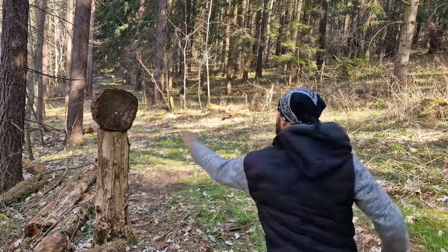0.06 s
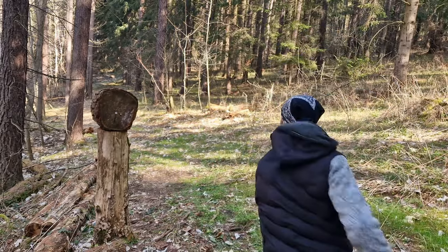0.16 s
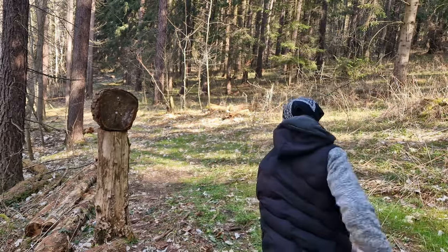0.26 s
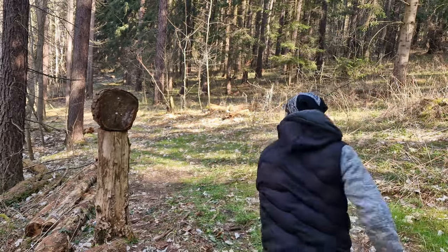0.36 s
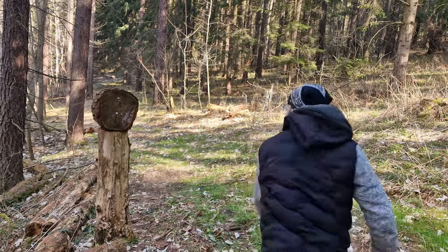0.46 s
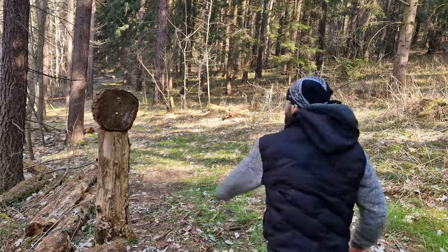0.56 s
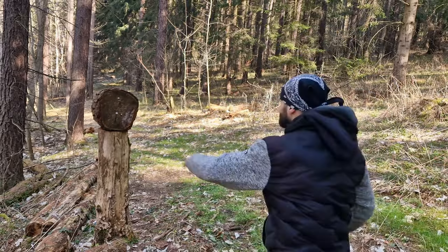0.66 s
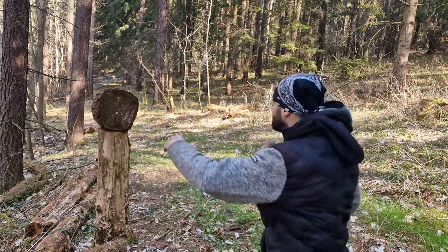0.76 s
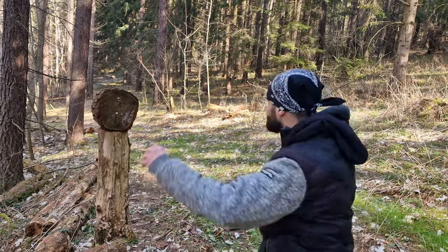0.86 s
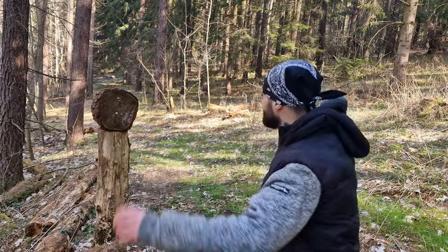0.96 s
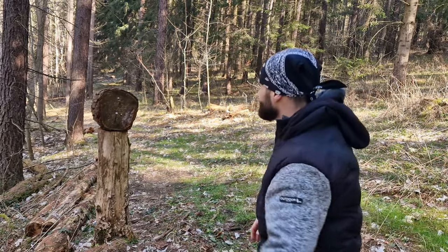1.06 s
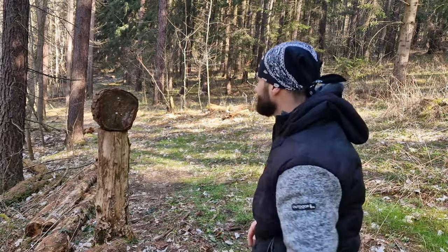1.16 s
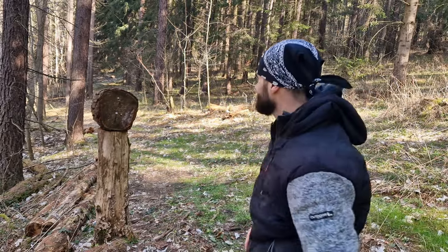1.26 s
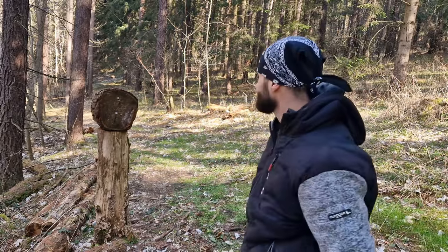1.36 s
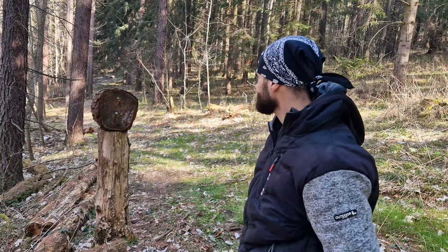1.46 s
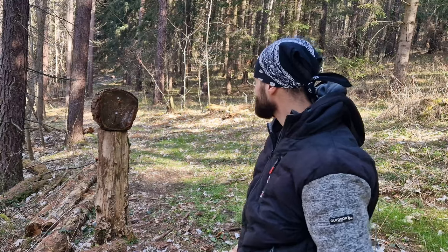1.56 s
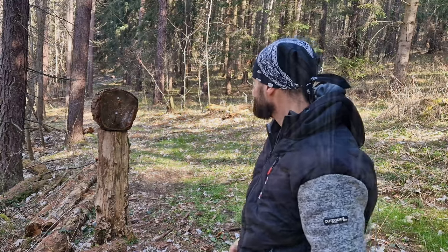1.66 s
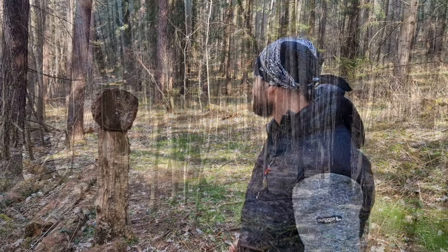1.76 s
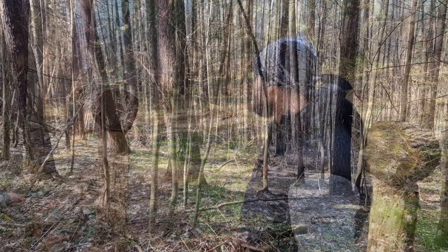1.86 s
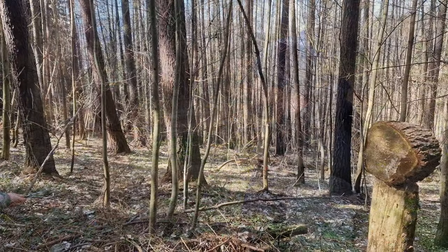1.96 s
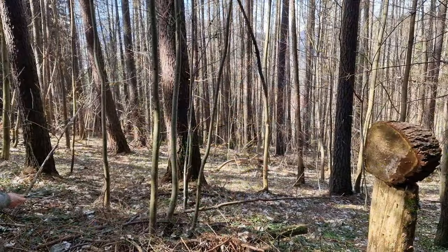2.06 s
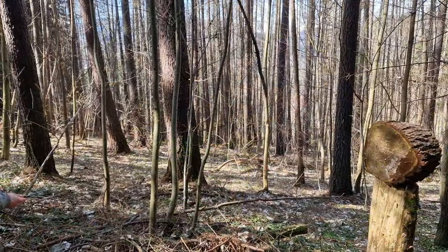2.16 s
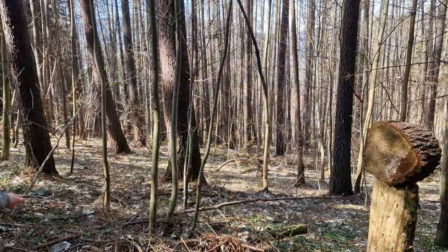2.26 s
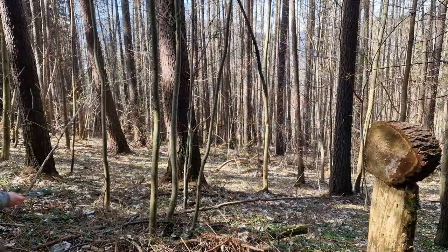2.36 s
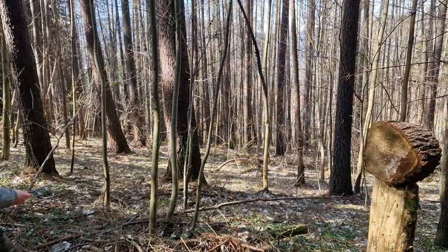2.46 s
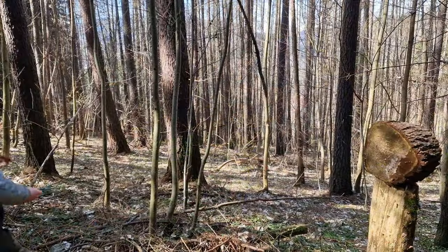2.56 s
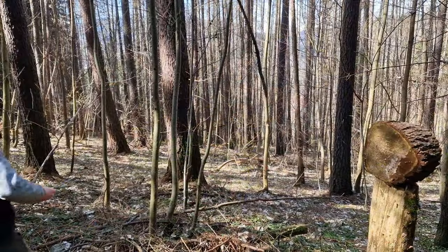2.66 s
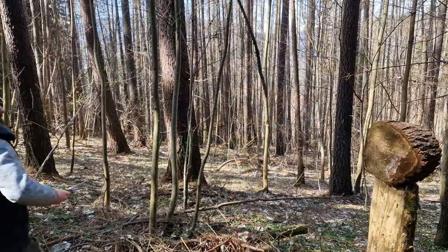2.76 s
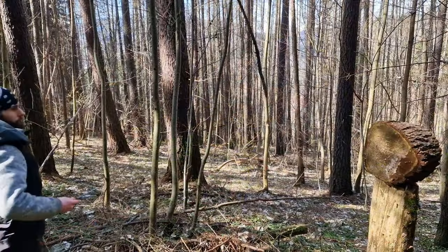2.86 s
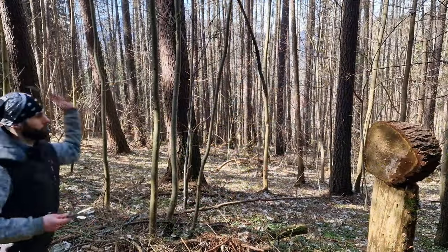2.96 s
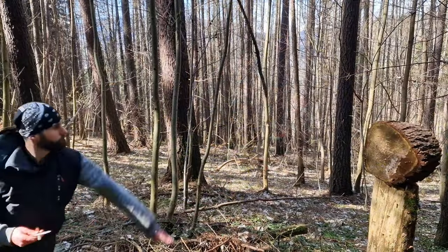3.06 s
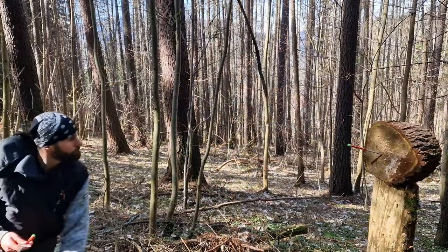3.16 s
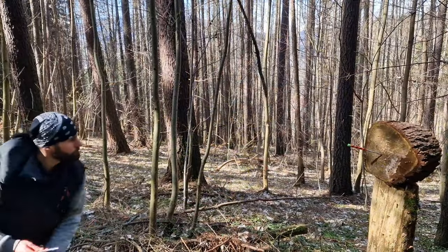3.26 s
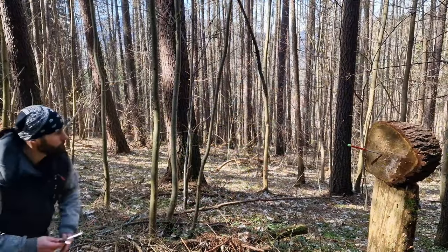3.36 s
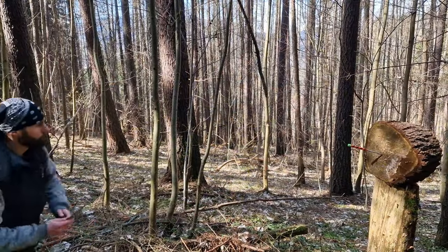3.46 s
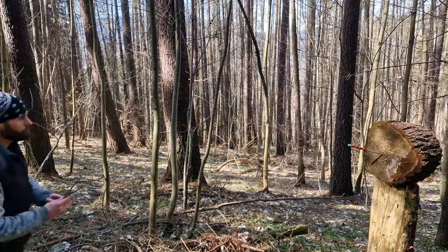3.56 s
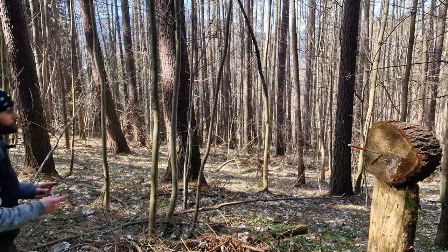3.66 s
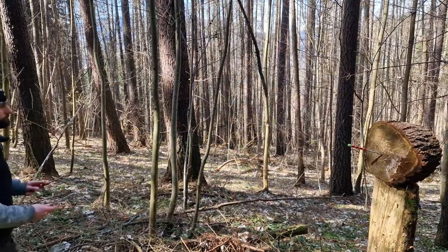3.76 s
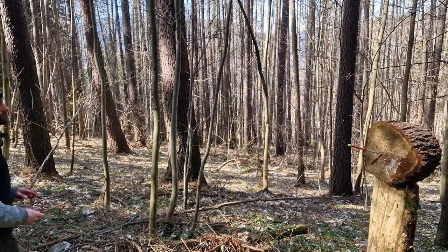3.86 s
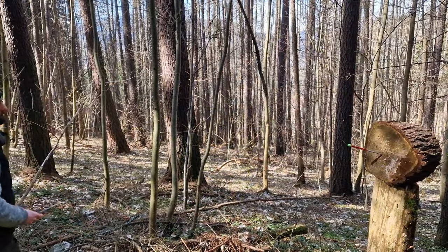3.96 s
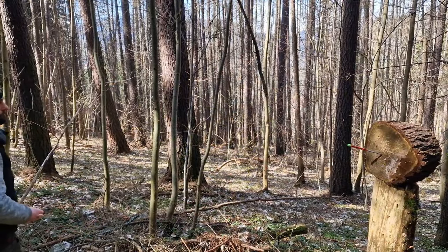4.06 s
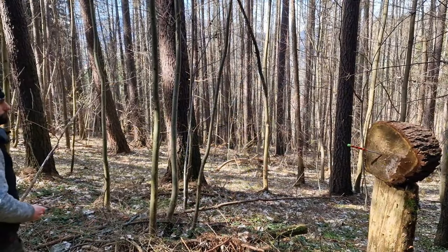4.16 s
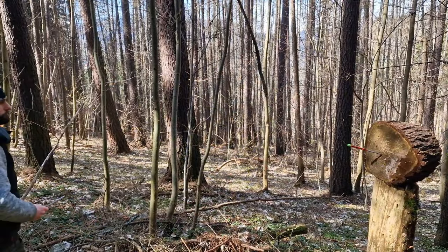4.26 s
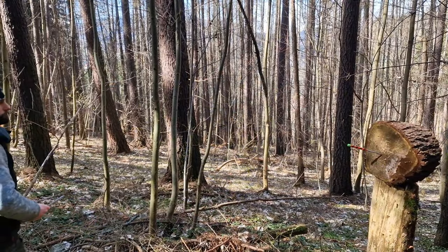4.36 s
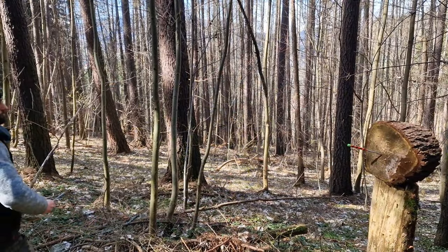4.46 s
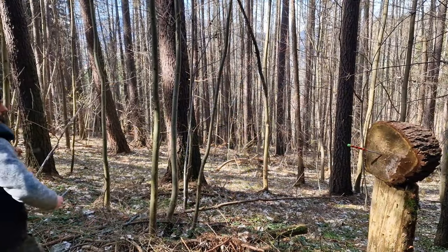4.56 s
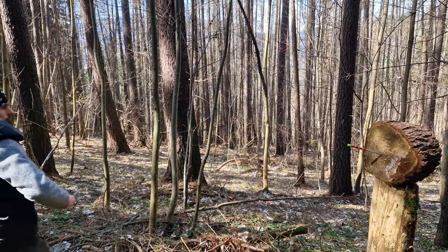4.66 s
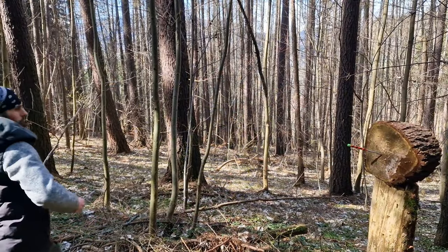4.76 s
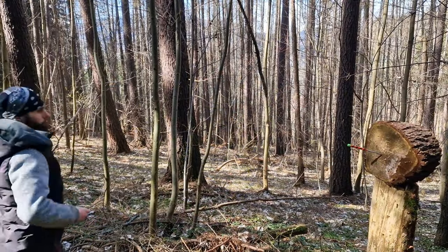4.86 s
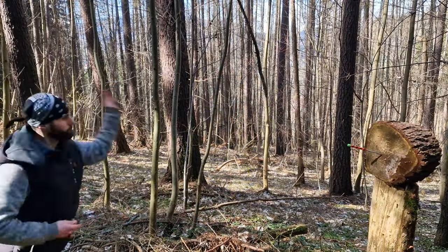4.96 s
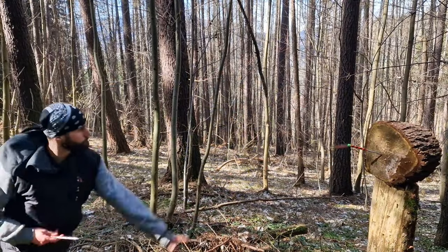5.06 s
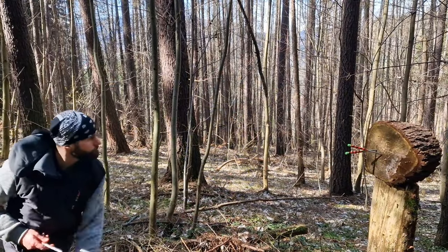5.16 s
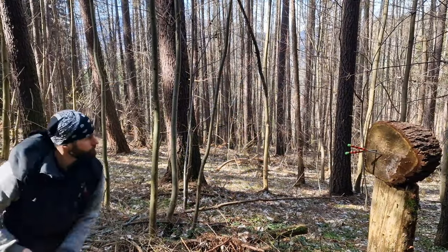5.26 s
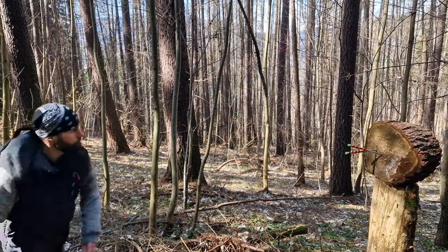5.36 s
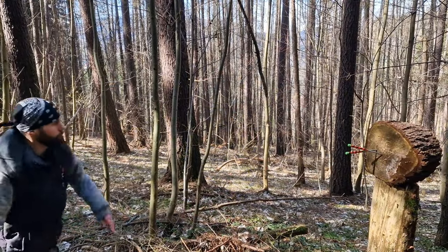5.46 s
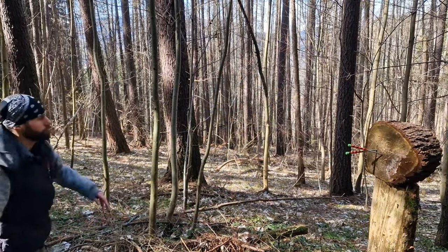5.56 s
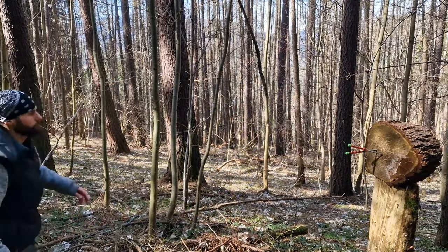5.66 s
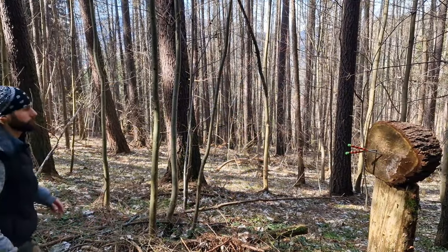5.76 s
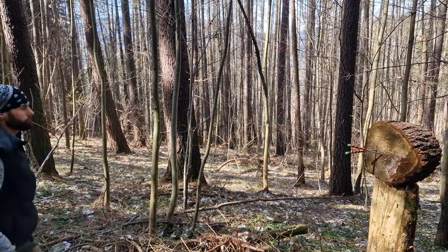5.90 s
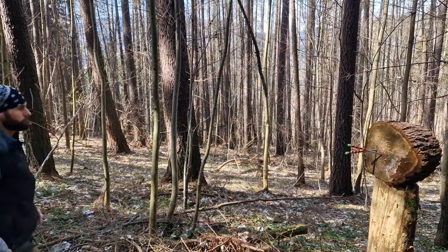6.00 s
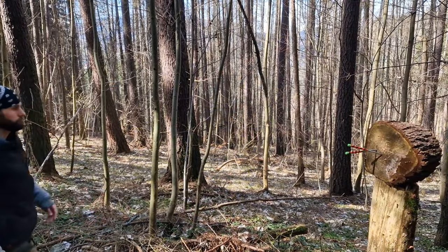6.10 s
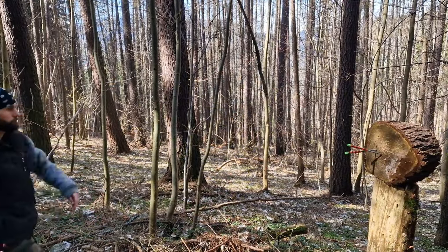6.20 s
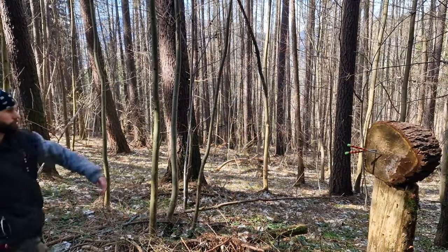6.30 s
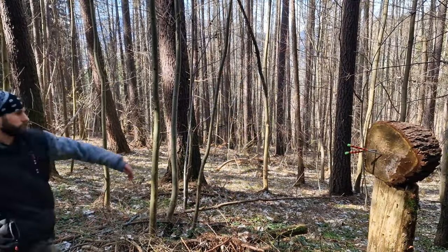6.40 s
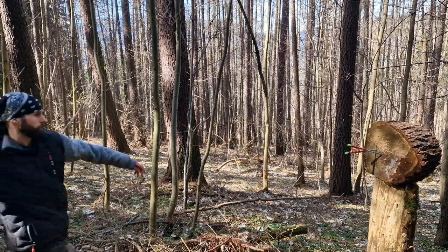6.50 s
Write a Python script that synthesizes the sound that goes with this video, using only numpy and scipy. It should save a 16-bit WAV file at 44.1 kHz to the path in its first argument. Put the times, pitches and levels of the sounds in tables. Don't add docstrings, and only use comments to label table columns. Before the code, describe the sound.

Three thrown steel nails thunk into a log, one early, two later, amid jacket swishes, low wind rumble and faint birds in a forest.

```python
import sys
import numpy as np
from scipy import signal
from scipy.fft import rfft, irfft, next_fast_len
from scipy.io import wavfile
from scipy.ndimage import uniform_filter1d, map_coordinates

SR = 44100
rng = np.random.default_rng(int(sys.argv[2]) if len(sys.argv) > 2 else 0)


def volts_from_decibels(level):
    exponent = np.asarray(level, float) / 20
    return 10 ** exponent


def to_wav(s):
    ch = np.atleast_2d(s).T
    pcm = np.round(np.clip(ch, -1, 1) * 32767)
    wavfile.write(sys.argv[1], SR, pcm.astype(np.int16))


N = 288149


def unit(x):
    return x / np.sqrt(np.mean(x ** 2) + 1e-20)


def along(points, hz):
    f, v = np.transpose(points)
    return np.interp(np.log(hz + 1), np.log(f + 1), v)


def curves(rows):
    s, *cols = np.transpose(rows)
    return [np.interp(np.arange(N) / SR, s, c) for c in cols]


def by_spot(pair):
    change_s, fade_s = 2.1, .02
    return np.interp(np.arange(N) / SR, [change_s - fade_s / 2, change_s + fade_s / 2], pair)


def wobble(rate):
    knots = rng.standard_normal(int(N * rate / SR) + 4)
    return map_coordinates(knots, [np.arange(N) * rate / SR])


def filtered(x, response):
    m = next_fast_len(x.shape[-1] + 8192)
    return irfft(rfft(x, m) * response(np.fft.rfftfreq(m, 1 / SR)), m)[..., :x.shape[-1]]


def band(count, hz, width):
    noise = rng.standard_normal(count)
    return unit(filtered(noise, lambda f: 1 / (1 + (np.log((f + 1) / hz) / width) ** 4)))


def two_bands(count, hz, width):
    return np.array([band(count, hz, width) for _ in range(2)])


def rush(spectrum, alike, patchy_db, grain_db):
    z = signal.stft(rng.standard_normal((2, N)), nperseg=512)[2]
    field = uniform_filter1d(rng.standard_normal(z.shape[1:]), size=8, axis=0)
    field = uniform_filter1d(field, size=8, axis=1)
    pair = signal.istft(z * volts_from_decibels(patchy_db * unit(field)), nperseg=512)[1][:, :N]
    pair = pair * volts_from_decibels(grain_db * wobble(400))

    def mid_and_side(hz):
        turn = np.arccos(np.clip(along(alike, hz), -1, 1)) / 2
        return volts_from_decibels(along(spectrum, hz)) * [np.cos(turn), np.sin(turn)]

    mid, side = filtered(pair, mid_and_side)
    return unit(np.array([mid + side, mid - side]))


def add(out, s, sound):
    place = out[:, round(s * SR):][:, :sound.shape[-1]]
    place += sound[..., :place.shape[1]]


def whistle(line_hz):
    return np.sin(2 * np.pi * np.cumsum(line_hz) / SR)


# (t/s, level/dB)
WIND_STRENGTH = [(0.0, -59.5), (0.42, -61), (1.47, -64), (1.91, -55.5), (1.98, -62), (2.85, -54),
                 (3.09, -51.5), (3.75, -58.5), (3.97, -58), (4.84, -61.5), (5.24, -59), (5.46, -61),
                 (5.67, -61), (5.91, -62.5), (6.04, -63), (6.53, -57.5)]
# (f/Hz, level/dB per Hz)
RUMBLE_COLOUR = [(12, -21.5), (25, -13.5), (36, -5), (50, -0.5), (62, -6.5), (75, -22), (110, -54.5),
                 (200, -120)]
# (f/Hz, level/dB per Hz)
UPPER_COLOUR = [(30, -56), (60, -14.5), (76, 0), (92, 0.5), (108, -7), (128, -17), (200, -34.5),
                (400, -120)]
# (f/Hz, level/dB per Hz)
TREETOP_COLOUR = [(76, -30), (130, -13.5), (228, -13.5), (322, -6.5), (356, -9.5), (394, -3.5),
                  (481, -12.5), (532, -11.5), (1100, -24), (1240, -23), (2320, -36), (3600, -35.5),
                  (4600, -42), (6500, -52.5), (16000, -61.5)]
# (f/Hz, likeness from -1 to 1)
AIR_LIKENESS = [(60, .98), (130, .94), (290, .72), (640, .45), (1400, -.1), (3100, 0), (15000, 0)]


def wind():
    deep_db, = curves(WIND_STRENGTH)
    gust_db = deep_db - deep_db.mean()
    roll = rush(RUMBLE_COLOUR, AIR_LIKENESS, patchy_db=0, grain_db=0.5)
    slow = np.abs(uniform_filter1d(roll[0] ** 2, size=SR // 6)) + .05
    deep = volts_from_decibels(deep_db + 6.0) * roll / np.sqrt(slow)
    upper_db = by_spot((-57.5, -62)) + 0.26 * gust_db + 1.5 * wobble(14)
    upper = volts_from_decibels(upper_db) * rush(UPPER_COLOUR, AIR_LIKENESS, patchy_db=1.5, grain_db=3.0)
    tops_db = by_spot((-64.5, -67)) + 0.31 * gust_db + 0.69 * wobble(7.6)
    tops = volts_from_decibels(tops_db) * rush(TREETOP_COLOUR, AIR_LIKENESS, patchy_db=1.1, grain_db=0.5)
    return deep + upper + tops


# (f/Hz, level/dB per Hz)
HISS_COLOUR = [(2000, -21.5), (5000, -1.5), (7500, -4), (11000, -3.5), (15600, 1), (15900, -43)]


def microphone_hiss():
    return volts_from_decibels(-99.5) * rush(HISS_COLOUR, AIR_LIKENESS, patchy_db=1.0, grain_db=-2.0)


# (f/Hz, level/dB per Hz)
CHORUS_COLOUR = [(2000, -44), (3000, -7), (3900, -6), (4800, -7), (5600, -14), (7400, -12), (10500, -34.5)]


def bird_chorus():
    level_db = by_spot((-83, -98)) + 2.3 * wobble(6.4)
    return volts_from_decibels(level_db) * rush(CHORUS_COLOUR, AIR_LIKENESS, patchy_db=1.0, grain_db=0.5)


def twitter():
    out = np.zeros((1, N))
    for at, pitch, glide, size in rng.random((200, 4)):
        count = round((.025 + .05 * size) * SR)
        line_hz = 3400 * 1.8 ** (pitch - .5) * np.linspace(1, .95 + .1 * glide, count)
        add(out, at * N / SR, volts_from_decibels(-100 + 6 * size) * np.hanning(count) * whistle(line_hz))
    return out


# (peak t/s, swish level/dB,
# rub level/dB, rise/s, fall/s)
SLEEVE_STROKES = [(0.042, -48.5, -43, 1, 0.25), (.229, -57.5, -49, 0.24, 0.2),
                  (0.367, -59.5, -53.5, 0.1215, 0.1), (.624, -68, -61.5, 0.56, 0.23),
                  (.723, -71, -64, 0.2, 0.11), (.798, -70, -63.5, 0.15, 0.17), (0.916, -64, -60, 0.18, 0.15),
                  (1.197, -58, -61, 0.057, 0.28), (1.347, -71, -62, 0.82, 0.23),
                  (1.51, -69, -71, 0.57, 0.15), (1.77, -74, -68, 0.31, 0.17), (2.089, -92, -72.5, 1, 0.021),
                  (2.45, -74.5, -91.5, 0.027, 0.36), (2.555, -64, -95, 0.13, 0.18),
                   (2.653, -64.5, -65.5, 0.039, 0.07), (2.815, -76.5, -68, 0.22, 0.16),
                   (3.0, -66.5, -59.5, 0.12, 0.75), (3.055, -54, -53.5, 0.039, 0.077),
                   (3.19, -75, -54.5, 0.22, 0.36), (3.215, -71.5, -72.5, 0.09, 0.1),
                   (3.312, -72, -62.5, 0.26, 0.039), (3.426, -68, -62, 0.11, 0.024),
                   (3.5, -84, -97, 0.26, 0.63), (3.777, -70.5, -60.5, 0.1, 0.16),
                   (3.9, -93, -79, 0.28, 0.56), (4.795, -70.5, -71.5, 0.13, 0.062),
                   (5.043, -59, -55.5, 0.09, 0.18), (5.006, -73.5, -61, 0.06, .15),
                   (5.169, -59, -48.5, 0.16, 0.17), (5.345, -69.5, -61, 1, 0.093),
                   (5.48, -87.5, -76, 0.198, 1), (5.705, -79.5, -68.5, .04, 0.33),
                   (5.77, -86, -75.5, 0.21, .12), (6.399, -79.5, -74, 0.087, .9),
                   (6.44, -76.5, -75.5, 0.35, .2)]


def strokes():
    t, power = np.arange(0, N, 32) / SR, 1e-12
    for s, swish_db, rub_db, rise, fall in SLEEVE_STROKES:
        drop_db = 24 * np.where(t < s, (s - t) / rise, (t - s) / fall)
        levels_db = [swish_db - drop_db, rub_db - drop_db / 0.85]
        power = power + volts_from_decibels(levels_db) ** 2
    return [np.interp(np.arange(N) / SR, t, level) for level in 10 * np.log10(power)]


# (f/Hz, level/dB per Hz)
NYLON_COLOUR = [(900, -23.5), (1500, -4), (2300, -11), (3200, -3.5), (5000, -2), (7000, 0.5), (10000, -4.5),
                (13000, -14.5), (15600, -9.5), (15900, -40.5)]
# (f/Hz, level/dB per Hz)
PADDING_COLOUR = [(76, -32), (130, -4), (262, -6), (421, -2), (498, -6), (1230, -10), (2130, -14.5),
                  (5000, -21), (6500, -45), (11000, -120)]
# (f/Hz, level/dB per Hz)
SHEEN_COLOUR = [(6000, -35.5), (9000, -5), (12000, 2.5), (15600, 1), (15900, -39)]
# (f/Hz, likeness from -1 to 1)
CLOTH_LIKENESS = [(130, 0.78), (290, 1), (640, 0.35), (1400, -0.11), (3100, -.05), (6800, -0.036),
                  (15000, -0.2)]


def jacket():
    swish_db, rub_db = strokes()
    uneven_db = .6 * wobble(60)
    swish = volts_from_decibels(swish_db - 1.5 + uneven_db) * rush(NYLON_COLOUR, CLOTH_LIKENESS, patchy_db=0.5, grain_db=2.0)
    rub = volts_from_decibels(rub_db + 1.0 + uneven_db) * rush(PADDING_COLOUR, CLOTH_LIKENESS, patchy_db=2.2, grain_db=2.0)
    lows = filtered(rub, lambda f: 1 / (1 + (f / 550) ** 4))
    rub = rub + (volts_from_decibels(by_spot((-4, 1.5))) - 1) * lows
    sheen_db = 1.307 * swish_db + 13.5 + uneven_db
    sheen = volts_from_decibels(sheen_db) * rush(SHEEN_COLOUR, CLOTH_LIKENESS, patchy_db=-2.0, grain_db=-2.0)
    return (swish + sheen + rub) * volts_from_decibels([[.8], [-.8]])


# (t/s, peak level/dB, f/Hz, left over right/dB)
SNAPS = [(0.133, -39, 800, -2), (0.32, -34.5, 1130, 0), (.32, -37, 1900, 0), (0.36, -50, 713, -6),
         (0.423, -40, 1450, 1), (0.459, -49, 910, 2), (0.629, -48, 1300, 3.0), (0.639, -51, 705, 2.0),
         (0.87, -42.5, 1120, 1), (1.153, -52, 570, 12), (1.184, -47, 950, 0), (1.187, -47, 500, 3),
         (1.239, -51, 1010, -2), (1.269, -49, 501, -6), (1.288, -47, 900, 11), (1.2925, -34, 1020, -2),
         (1.2925, -40.5, 516, 1), (1.2983, -45, 900, 0), (1.787, -47, 940, 3.5), (1.788, -52, 650, 3),
         (1.794, -55, 450, 2), (2.604, -45.5, 550, 7), (2.65, -50.5, 845, 5), (2.651, -59, 1510, 5),
         (2.711, -52, 720, 0), (2.8001, -49, 1030, 9), (3.423, -50.5, 1300, 14), (2.945, -54, 1300, 3),
         (2.688, -63, 1050, 5), (3.016, -56, 1500, 3), (1.352, -53, 1500, 1), (5.561, -50, 1400, 10),
         (1.153, -50.5, 1700, 6), (1.334, -52, 1000, -1), (.279, -39, 2000, 0), (3.289, -66, 418, 0)]


def snaps_and_clinks():
    out, t = np.zeros((2, N)), np.arange(SR // 8) / SR
    for s, db, hz, pan_db in SNAPS:
        ring = -np.sin(2 * np.pi * hz * t) * volts_from_decibels(-60 * t * hz / 4.5)
        rustle = .1 * volts_from_decibels(-60 * t / .025) * band(len(t), .8 * hz, width=.55)
        onset = 1 - np.exp(-t / 0.00073)
        add(out, s, volts_from_decibels(db + 7.5 + pan_db * np.array([[.5], [-.5]])) * (ring + rustle) * onset)
    return out


# (t/s, peak level/dB, f/Hz, left over right/dB, width in log frequency)
CLOTH_TICKS = [(0.717, -52.5, 5900, 5, 0.53), (0.965, -58, 9000, 10, .6), (1.057, -65, 5500, 3.3, .4),
               (.134, -54, 7000, 4.5, .6), (1.284, -60, 8000, 7, .7), (1.272, -58, 13000, 4, .12),
               (1.334, -55, 8000, 6, .25), (1.3503, -50, 5000, 5, 0.8), (1.4228, -55.5, 11530, 8, 0.38),
               (1.458, -56, 6200, 8, 0.58), (1.474, -59, 4500, 7, .25), (1.485, -57, 4400, 5, .25),
               (1.494, -57.5, 7500, 9, .4), (1.508, -62, 4800, 5, 0.32), (1.5227, -58, 8500, 14, .55),
               (2.644, -56, 4150, 8, .1), (2.645, -60, 8500, 6, .4), (2.655, -53, 5300, 6, .2),
               (2.656, -64, 7500, 8, 0.52), (2.559, -64, 7500, 4, 0.37), (2.958, -73, 10400, 6, .2),
               (3.048, -58, 5000, 3, .25), (3.054, -47, 7250, 4.5, 0.23), (3.057, -44, 13800, 5, .12),
               (3.067, -49, 11070, 4.5, .5), (3.408, -62, 12800, 8.9, .18), (3.4239, -50, 8000, 14, .6),
               (3.738, -62, 5840, 8, .45), (3.7713, -62, 3600, 10.2, 0.54), (4.793, -54.5, 7460, 13, 0.77),
               (5.047, -37.5, 10900, 4, 0.43), (5.795, -63, 4200, 3.5, 0.13),
               (5.031, -48, 11500, 2.5, 0.35), (5.5, -79, 9000, 3, 0.37), (5.562, -68, 3300, 9, .35),
               (6.523, -66, 9640, 3.8, .6)]


def ticks():
    out, t = np.zeros((2, N)), np.arange(SR // 8) / SR
    for s, db, hz, pan_db, width in CLOTH_TICKS:
        noise = band(len(t), hz, width) + .7 * two_bands(len(t), hz, width)
        scrape = filtered(noise, lambda f: .8 * (f < 15800))
        shape = volts_from_decibels(-60 * t / .012) * (1 - np.exp(-t / .0004))
        add(out, s, volts_from_decibels(db + pan_db * np.array([[.5], [-.5]])) * shape * scrape)
    return out


DUST_LEVELS = (-47.5, -41, -40.5)
TORN_HZ, TORN_T60_S = (4950, 3600, 3560), (0.052, 0.045, .035)


def splinters(i, t, splinter_db):
    torn = two_bands(len(t), TORN_HZ[i], width=0.64)
    tearing = (t < .0019) + volts_from_decibels(1.0 - 60 * t / TORN_T60_S[i])
    dust = volts_from_decibels(DUST_LEVELS[i] - 60 * t / 0.048) * two_bands(len(t), 9400, width=.35)
    return volts_from_decibels(splinter_db - 6.5) * tearing * torn + dust


# (f/Hz, level/dB)
STEEL_TONES = [
    [(4300, 7.5), (5300, 2.5), (7500, 1), (10000, -10.5), (13500, -18)],
    [(2700, 4.5), (3700, 6.5), (5500, -2), (7100, -12), (9000, -7), (11000, -13.5), (13500, -14.5)],
    [(2500, 0.5), (3700, 2.5), (5750, -6), (7800, 1), (10000, -3.5), (12800, -7.5), (15000, -10)],
]


def steel_chatter(i, t, after, splinter_db):
    chatter = sum(volts_from_decibels(db) * np.sin(2 * np.pi * (hz * t + rng.random())) for hz, db in STEEL_TONES[i])
    return volts_from_decibels(splinter_db - 60 * np.maximum(after - .0002, 0) / 0.0007) * chatter


# (f/Hz, level/dB, time to fall 60 dB/s)
LOG_TONES = [
    [(95, -26, 0.14), (206, -6, 0.021), (291, -4.5, 0.02), (443, -2.5, 0.013), (620, -14, .008),
     (756, -14.5, 0.024), (832, -27.5, 0.045), (1400, -13, 0.034), (2200, -20, 0.03), (2250, -35, 0.1),
     (2350, -35, .1), (1924, -31.5, 0.067), (3130, -29.5, 0.031)],
    [(161, -10, 0.054), (246, -4, 0.021), (400, -8, 0.14), (532.5, -8.5, 0.013), (756, -22.5, 0.063),
     (900, -3.5, 0.02), (1010, -4.5, 0.022), (1243, -15, 0.078), (1390, -1, .016), (1570, -5, 0.028),
     (2080, -19, 0.037), (2800, -22, 0.036), (2320, -24, 0.034), (111, -16, 0.08)],
    [(257, 2, 0.012), (404, -11.5, 0.077), (500, -16.5, 0.027), (567, -1.5, 0.0086), (693, -12, 0.034),
     (1030, -3, 0.022), (1212, -12, 0.056), (1330, -15, 0.012), (2400, -22.5, 0.019), (130, -9.5, 0.021),
     (845, -16, .04), (1900, -29.5, 0.033), (3200, -27.5, 0.06), (3720, -22, 0.044)],
]


def log_ring(i, after):
    return sum(volts_from_decibels(db - 60 * after / t60) * np.sin(2 * np.pi * hz * after) for hz, db, t60 in LOG_TONES[i])


# (f/Hz, level/dB, time to fall 60 dB/s)
SHANK_TONES = [
    [(2300, -44, 0.8), (1600, -50, .6)],
    [(915, -43, .95), (1560, -46, .9), (1225, -49, .5)],
    [(1215, -40, 0.5), (920, -48, .3), (1558, -51, 0.45)],
]


def shank_quiver(i, after):
    tones = sum(volts_from_decibels(db - 60 * after / t60) * band(len(after), hz, width=.05) for hz, db, t60 in SHANK_TONES[i])
    return (1 - np.exp(-after / .002)) * tones


GROUND_LEVELS = (-14.5, -7, -5)
# (delay/ms, level/dB)
NEAR_TRUNK = [(10.5, -19), (11, -17.5), (10.3, -18.5)]


def with_bounces(i, blow, bounce_ms):
    late_ms, late_db = NEAR_TRUNK[i]

    def copies(f):
        ground = volts_from_decibels(GROUND_LEVELS[i]) * np.exp(-2j * np.pi * f * bounce_ms / 1000)
        trunk = volts_from_decibels(late_db) * np.exp(-2j * np.pi * f * late_ms / 1000) / (1 + 1j * f / 1500)
        return 1 + ground + trunk

    return filtered(blow, copies)


def to_both_sides(x, side):
    far_side = np.array([[side < 0], [side > 0]])
    lag_s = .000158

    def shift(f):
        return np.exp(-2j * np.pi * f * lag_s * far_side) * volts_from_decibels(-.6 * far_side * f / (f + 4000))

    return filtered(x[None], shift)


# (f/Hz, time to fall 60 dB/s)
TRUNK_ECHO = [(100, 0.98), (400, 0.79), (1200, 0.5), (3000, 0.49), (10000, 0.15)]


def echo(x, gap_s, speed):
    hz, t, z = signal.stft(rng.standard_normal((2, SR)), SR, nperseg=256)
    fade = volts_from_decibels(-60 * speed * t / along(TRUNK_ECHO, hz)[:, None])
    tail = signal.istft(z * fade, SR, nperseg=256)[1]
    delayed = np.pad(x, (round(gap_s * SR), 0))[None]
    return signal.fftconvolve(delayed, tail / np.linalg.norm(tail[0]), axes=1)


# (t/s, thump level/dB, crunch level/dB, splinter level/dB, side +1 left -1 right, ground bounce/ms)
THROWS = [
    (0.1851, -11, -36.5, -29, 1, 3.2),
    (3.1572, -14, -28, -32, -1, 3.97),
    (5.131, -13.5, -32, -29.5, -1, 4.17),
]
TRAVEL_MS = (1.25, 1.5, 1.65)


def nails():
    out, t = np.zeros((2, N)), np.arange(SR // 2) / SR
    for i, (s, thump_db, crunch_db, splinter_db, side, bounce_ms) in enumerate(THROWS):
        travel_s = TRAVEL_MS[i] / 1000
        after = np.maximum(t - travel_s, 0)
        add(out, s, splinters(i, t, splinter_db))
        entry = steel_chatter(i, t, after, splinter_db)
        drag = -.45 * np.sin(np.pi * np.minimum(t / (travel_s + 0.0009), 1)) ** 2
        crunch = volts_from_decibels(crunch_db - 60 * after / .06) * band(len(t), 950, width=.5)
        onset = 1 - np.exp(-after / 0.00043)
        thump = (volts_from_decibels(thump_db) * log_ring(i, after) + crunch) * onset
        blow = thump + volts_from_decibels(thump_db) * drag + volts_from_decibels(-4.0) * entry
        blow = with_bounces(i, blow, bounce_ms)
        quiver = volts_from_decibels(thump_db) * shank_quiver(i, after)
        add(out, s, to_both_sides(blow + quiver + 0.44 * entry, side))
        add(out, s, volts_from_decibels(-23.5) * echo(blow, gap_s=0.0026, speed=3.1))
    return out


# (t/s, level/dB, f/Hz, time to fall 60 dB/s)
SOFT_THUDS = [
    (3.072, -31.5, 162, 0.073),
    (5.003, -44, 232, 0.05),
    (5.755, -34, 187, 0.068),
    (5.8, -42.5, 140, 0.043),
    (3.741, -50.5, 149, 0.084),
    (5.031, -43, 150, 0.1),
    (5.015, -50, 420, 0.045),
    (5.06, -49, 220, .05),
    (3.4, -43.5, 210, .05),
    (.212, -41.5, 290, 0.054),
]


def thuds():
    out, t = np.zeros((2, N)), np.arange(SR // 8) / SR
    for s, db, hz, t60 in SOFT_THUDS:
        litter = 0.091 * volts_from_decibels(45 * t / t60) * band(len(t), 1.6 * hz, width=0.88)
        body = litter - np.sin(2 * np.pi * hz * t)
        add(out, s, volts_from_decibels(db - 60 * t / t60) * body * (1 - np.exp(-t / 0.0023)))
    return out


# (start t/s, end t/s, start f/Hz, end f/Hz, level/dB)
FAR_BIRD_NOTES = [(1.55, 1.59, 7250, 7350, -85), (1.71, 1.745, 3300, 4600, -75),
                  (1.745, 1.765, 4600, 5000, -75), (1.75, 1.765, 4400, 3400, -77),
                  (1.7, 1.712, 4000, 3400, -77), (1.565, 1.595, 3700, 5000, -83),
                  (1.59, 1.6, 5000, 4000, -77), (1.83, 1.865, 8200, 6900, -82),
                  (1.845, 1.86, 7550, 7450, -79), (1.865, 1.882, 7500, 7450, -79),
                  (1.885, 1.897, 7200, 7250, -81), (1.86, 1.89, 3300, 5000, -76),
                  (1.889, 1.899, 3300, 4600, -72), (1.845, 1.856, 5000, 3300, -73),
                  (1.968, 2.008, 6450, 6480, -80), (1.968, 1.99, 3500, 4900, -77),
                  (2.008, 2.022, 4300, 3900, -72), (2.005, 2.025, 4800, 4750, -77),
                  (2.087, 2.098, 4600, 3000, -72), (1.998, 2.012, 2800, 4400, -76),
                  (2.15, 2.23, 7450, 7350, -93), (2.355, 2.555, 7270, 7170, -77),
                  (2.48, 2.5, 5050, 5000, -77), (2.52, 2.545, 5300, 5200, -75),
                  (2.535, 2.555, 6200, 6100, -76), (2.68, 2.705, 4050, 4000, -81),
                  (3.295, 3.325, 3500, 4800, -72), (3.3, 3.335, 4300, 4700, -74),
                   (4.23, 4.35, 4100, 4050, -87), (4.09, 4.16, 4750, 4700, -91),
                   (4.03, 4.05, 6300, 6250, -91), (4.77, 4.8, 2250, 2400, -83),
                   (4.805, 4.87, 2430, 2720, -81), (4.42, 4.48, 2750, 2750, -89),
                   (4.58, 4.63, 5000, 5000, -90), (4.42, 4.53, 3300, 3400, -90),
                   (4.56, 4.66, 3500, 3450, -89), (4.69, 4.76, 3500, 3450, -88),
                   (4.86, 4.94, 2680, 2990, -78), (4.93, 4.995, 2950, 3270, -80),
                   (6.48, 6.498, 2350, 2250, -78), (5.7, 5.75, 7250, 7450, -86),
                   (5.94, 6.08, 8050, 7450, -99), (5.4, 5.44, 3600, 3300, -86),
                   (6.14, 6.19, 7800, 7750, -96), (1.99, 2.035, 6900, 7600, -83),
                   (6.275, 6.335, 4300, 3400, -84), (6.2, 6.24, 7400, 7350, -95)]


def far_birds():
    out = np.zeros((1, N))
    for s, end, start_hz, end_hz, db in FAR_BIRD_NOTES:
        line_hz = np.linspace(start_hz, end_hz, round((end - s) * SR))
        add(out, s, volts_from_decibels(db - 1.8) * np.hanning(len(line_hz)) ** .5 * whistle(line_hz))
    return out


# (t/s, f/Hz, level/dB)
NEAR_BIRD = [
    (5.828, 7140, -83),
    (5.851, 7560, -72),
    (5.865, 7500, -69),
    (5.875, 9370, -69.5),
    (5.884, 9040, -67),
    (5.894, 7960, -72),
    (5.91, 8170, -75),
    (5.94, 7490, -105),
]


def near_bird():
    hz, db = curves(NEAR_BIRD)
    t = np.arange(N) / SR
    inside_s = np.minimum(t - NEAR_BIRD[0][0], NEAR_BIRD[-1][0] - t)
    return np.clip(inside_s / 0.0057, 0, 1) * volts_from_decibels(db) * whistle(hz)


def birds():
    far = (twitter() + far_birds())[0]
    song = far * (1 + .4 * wobble(300)) * volts_from_decibels(1.5 + 1.6 * wobble(71)) + near_bird()
    smear = volts_from_decibels(-6) * echo(song, gap_s=0.014, speed=1.6)[:, :N]
    return song * volts_from_decibels([[.7], [-.7]]) + smear


def scene():
    return wind() + bird_chorus() + jacket() + snaps_and_clinks() + ticks() + nails() + thuds() + birds()


def low_pass(x):
    return signal.sosfilt(signal.butter(12, 16800, fs=SR, output="sos"), x)


def record(dry):
    def response(f):
        return (1j * f / (30 + 1j * f)) ** 2 * (f < 16600) * volts_from_decibels([[.2], [-.2]])

    return low_pass(filtered(dry + microphone_hiss(), response))


dry = scene()
out = record(dry)
to_wav(out)
```